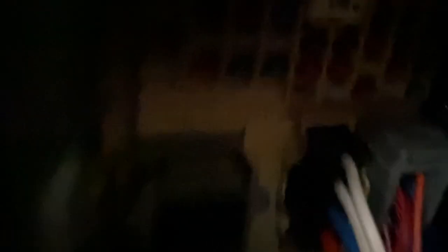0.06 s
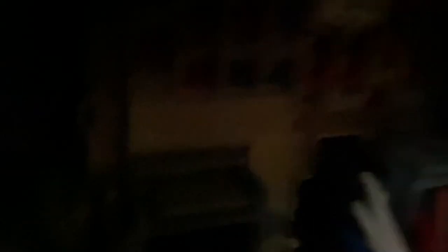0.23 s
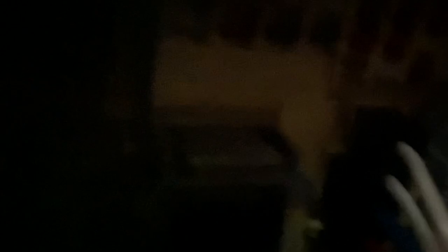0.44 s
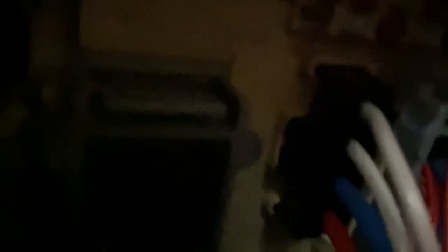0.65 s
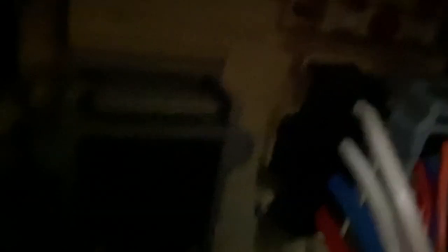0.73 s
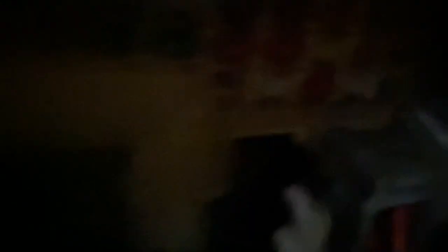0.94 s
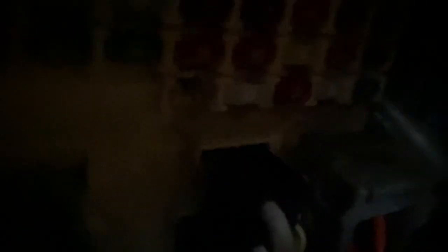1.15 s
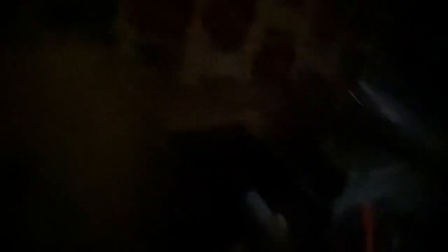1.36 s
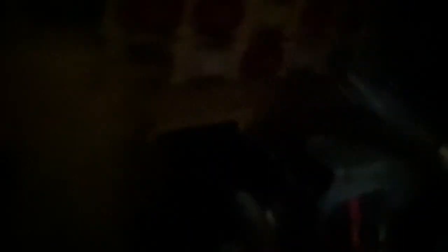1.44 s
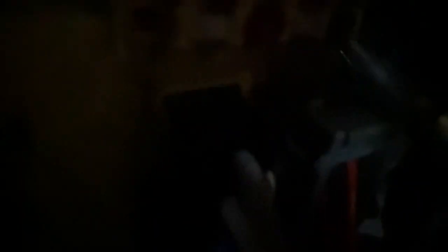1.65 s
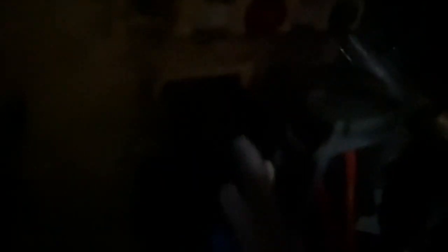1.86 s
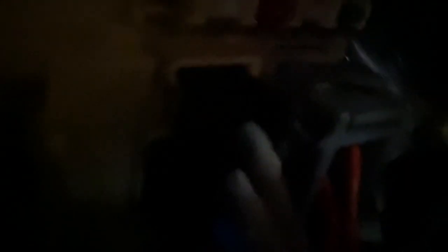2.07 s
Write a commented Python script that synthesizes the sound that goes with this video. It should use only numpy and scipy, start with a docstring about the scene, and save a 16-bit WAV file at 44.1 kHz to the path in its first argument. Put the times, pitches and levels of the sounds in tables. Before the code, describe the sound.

Fast, dry clicks come nonstop from a relay in a plastic fuse box inside a car. A short bump on the trim sounds near the start, then the clicking is heard slightly closer, with faint rumble and hiss beneath.

```python
"""Relay chatter in a car

A relay in the fuse box clicks about 21 times a second, with a few stumbles. Each click is a light
tick, the armature's strike and two rebounds, which excite the plastic case and a small spring.
Early on, a bump sets a trim panel vibrating and rattling; after a second the microphone moves closer.
A low hum, a rumble and a fading hiss lie underneath."""
import sys
import numpy as np
from scipy import signal
from scipy.fft import rfft, irfft, next_fast_len
from scipy.io import wavfile
from scipy.ndimage import uniform_filter1d

SR = 44100
rng = np.random.default_rng(int(sys.argv[2]) if len(sys.argv) > 2 else 0)


def persist_wave(psi):
    """Save psi, clipped to +-1, as 16-bit WAV."""
    counts = np.round(np.clip(psi, -1, 1) * 32767).astype(np.int16)
    wavfile.write(sys.argv[1], SR, np.atleast_2d(counts).T)


N = 92610

# low hum and the drone beneath it: time_s, pitch_hz, level_db
HUM = [(0, 94, -59), (.08, 90.13, -54), (.36, 89.67, -47), (.46, 108.2, -50.5), (.68, 106.2, -51.5),
       (.78, 104.8, -73.5), (.85, 107, -49.5), (.91, 103.5, -69.5), (1, 104.6, -54), (1.12, 105, -50.5),
       (1.27, 109.6, -51), (1.33, 100.3, -64), (1.39, 109.9, -51), (1.49, 108.6, -51.5), (1.57, 108.6, -64),
       (1.69, 109.9, -50.5), (2.1, 107, -52.5)]
DRONE = [(0, 53.14, -55), (1.15, 55.17, -65.5), (1.7, 58.76, -58)]
# spectra of the cabin noises: frequency_hz, gain_db
RUMBLE_SPECTRUM = [(20, -22), (95, 4), (170, -6), (800, -22.5), (2000, -68)]
HISS_SPECTRUM = [(100, -6), (600, 0), (5500, -7), (8000, -13), (16000, -19)]
# envelopes of the cabin noises: time_s, level_db
RUMBLE_LEVEL = [(0, -58), (.26, -44), (.45, -56), (2.1, -58)]
HISS_LEVEL = [(0, -48.5), (.22, -45), (.4, -54), (.7, -60.5), (1.2, -66.5), (2.1, -66)]
# relay clicks: start_s
CLICKS = [0.0022, 0.047, .095, 0.143, .187, 0.2341, .281, 0.328, 0.3738, 0.4208, 0.4662, 0.5101, 0.558,
          0.6033, 0.6502, .7, 0.7483, 0.796, 0.8446, .892, 0.939, 0.9872, 1.0339, 1.0792, 1.1263, 1.171,
          1.218, 1.286, 1.3299, 1.3776, 1.42, 1.4656, 1.5334, 1.5806, 1.6267, 1.6713, 1.7168, 1.764, 1.81,
          1.8563, 1.921, 1.9675, 2.015, 2.0606]
# strength of the chatter: time_s, gain_db
RELAY_GAIN = [(.25, -4), (.6, -1), (1.42, -0.5), (2.06, -0.63)]
# armature's strike and two rebounds within a click: start_ms, level_db, t60_ms
CONTACTS = [(-.3, 0, 4.5), (1.1, -1, 4), (2.4, -12, 10)]
# resonances of the plastic case: centre_hz, half_width_hz, far_db, close_db
CASE_MODES = [(678, 54, -9.5, -5.5), (1039, 111, 2.5, 2), (2293, 115, -2.5, -2), (2561, 91, -0.5, 2.0),
              (3060, 33, -12, -2), (3224, 110, -5.5, 0.5), (3856, 49, -4, -1.5), (4170, 76, 4.5, 1),
              (4685, 125, 9, 10.5), (5400, 105, -1.5, 0), (6220, 270, -11, -12), (7420, 71, -9, -4.0),
              (7990, 150, -12, -3), (8690, 114, -2, 2), (9380, 177, 4.5, 6.5), (9980, 116, 1.5, -14.5),
              (10790, 120, 4, 2), (11465, 190, -1.5, 3), (12135, 160, 2, 7.5), (15600, 191, -10, -8.5)]
# response of the case between resonances: frequency_hz, gain_db
CASE_FLOOR = [(100, -23.5), (400, -24.5), (1700, -36), (7000, -18.5), (14000, -11.5), (16500, -34.5)]
# microphone's move from far to close: start_s, end_s
APPROACH = (1, 1.03)
# modes of the spring and frame: pitch_hz, level_db, t60_s
SPRING_MODES = [(3345, -57, .32), (1080, -54, .075), (695, -60, .06)]
# spectrum of the fuse box's rattle: frequency_hz, gain_db
RATTLE_SPECTRUM = [(200, -21.5), (650, -19.5), (4500, -10.5), (9000, -11.5), (16000, -38)]
# impacts on the trim: start_s, boom_db, crack_db
BUMPS = [(0.226, -29.5, -50), (0.2348, -5, -7), (0.2567, -17, -18), (0.272, -22.5, -30), (0.297, -27, -46),
         (0.325, -36, -54), (0.36, -28.5, -47)]
# modes of the trim panel: pitch_hz, level_db, t60_s
PANEL_MODES = [(85.7, -10.5, 0.15), (141.3, -20, 0.15), (189.8, -0.5, 0.054), (235, 4, 0.033),
               (319, -5, 0.055), (508.2, -21, .12), (692, -18.5, 0.11), (738, -25.5, 0.064),
               (873, -7, 0.032), (1223, -23, 0.083), (1313, -17, 0.045), (1760, -20.5, 0.047),
               (2110, -20.5, 0.028)]
# spectrum of the trim's crack and scuff: frequency_hz, gain_db
CRACK_SPECTRUM = [(300, 1), (850, 18), (1400, 5.5), (3200, 2), (4600, -10.5), (12000, -35)]
# right microphone port relative to the left: frequency_hz, gain_db
RIGHT_GAIN = [(300, 1.5), (1000, -17), (1700, 6), (3200, -10), (4800, -11.5), (6800, -0.5)]
# phase of the right port behind the left: frequency_hz, lag_rad
RIGHT_LAG = [(260, 0), (700, 2.2), (3300, .4), (6700, 0), (9000, -3), (11000, -6.1), (15000, -12.5)]


def amp(db):
    """Decibels as an amplitude ratio."""
    return 10 ** (np.asarray(db) / 20)


def along(points, hz):
    """Interpolation on a logarithmic frequency axis."""
    knots_hz, values = np.transpose(points)
    return np.interp(np.log(hz + 1), np.log(knots_hz + 1), values)


def curves(rows):
    """Linear interpolation in time: one value per sample for each later column."""
    time_s, *columns = np.transpose(rows)
    return [np.interp(np.arange(N) / SR, time_s, column) for column in columns]


def filtered(x, response):
    """Linear filtering multiplies the spectrum by a frequency response."""
    size = 2 * next_fast_len(N)
    return irfft(rfft(x, size) * response(np.fft.rfftfreq(size, 1 / SR)), size)[..., :N]


def causal(gain):
    """A minimum-phase response with this gain rings only after it is excited."""
    cepstrum = irfft(np.log(np.maximum(gain, 1e-6)))
    half = len(cepstrum) // 2
    cepstrum[1:half] *= 2
    cepstrum[half + 1:] = 0
    return np.exp(rfft(cepstrum))


def decay(t, t60):
    """Exponential decay of 60 dB in t60, silent before t = 0."""
    return (t >= 0) * np.exp(-np.log(1000) * np.abs(t) / t60)


def ring(t, modes):
    """Free vibration is a sum of damped sinusoids."""
    return sum(amp(db) * decay(t, t60) * np.sin(2 * np.pi * hz * t) for hz, db, t60 in modes)


def add(track, start_s, sound):
    """Superposition: the sound joins the track at start_s."""
    i = round(start_s * SR)
    part = sound[max(-i, 0):N - i]
    track[max(i, 0):max(i, 0) + len(part)] += part


def hum(rows):
    """A low tone wavers in pitch and level; its phase is the integral of its frequency."""
    hz, db = curves(rows)
    cycles = np.cumsum(hz) / SR + rng.random()
    return np.sqrt(2) * amp(db) * np.sin(2 * np.pi * cycles)


def cabin_noise(spectrum, levels, side_db):
    """Coloured noise gains width from a side signal of opposite sign in the two channels."""
    mid, side = filtered(rng.standard_normal((2, N)), lambda hz: amp(along(spectrum, hz)))
    stereo = np.array([mid + amp(side_db) * side, mid - amp(side_db) * side])
    level_db, = curves(levels)
    return amp(level_db) * stereo / np.sqrt(np.mean(stereo ** 2))


def contact_noise(envelope, passes):
    """A brief contact is broadband: a burst of unit energy with a nearly flat spectrum."""
    burst = envelope * rng.standard_normal(len(envelope))
    for _ in range(passes):  # flatten the spectrum, then restore the envelope
        burst = irfft(np.exp(1j * np.angle(rfft(burst))), len(envelope))
        burst *= envelope / np.sqrt(np.abs(uniform_filter1d(burst ** 2, size=32)) + 1e-16)
    return burst / np.linalg.norm(burst)


def armature(tick_lead_ms=4, tick_db=-11.5, variety=0.35):
    """Impact excitation: a light tick, a strike and two rebounds, nearly alike in every click."""
    t_ms = np.arange(-256, 1280) / SR * 1000
    tick = decay(t_ms + tick_lead_ms, t60=5)
    strike = np.sqrt(sum((amp(db) * decay(t_ms - ms, t60)) ** 2 for ms, db, t60 in CONTACTS))
    blows = np.zeros(N)
    for envelope, gain in ((tick, amp(tick_db)), (strike, 1)):
        envelope = envelope / np.linalg.norm(envelope)
        repeated = contact_noise(envelope, passes=40)
        for start_s in CLICKS:
            fresh = variety * envelope * rng.standard_normal(len(t_ms))
            add(blows, start_s + t_ms[0] / 1000, gain * (repeated + fresh))
    return blows


def case_response(hz, levels_db):
    """The resonances of the plastic case add in power above a broad floor."""
    power = amp(along(CASE_FLOOR, hz)) ** 2
    for (centre_hz, half_width_hz, *_), db in zip(CASE_MODES, levels_db):
        detuning = (hz - centre_hz) / half_width_hz
        power += (amp(db) / (1 + detuning ** 2)) ** 2
    return causal(np.sqrt(power))


def relay_case(blows):
    """The case resonates to the blows; the balance of its modes depends on the listening position."""
    _, _, far_db, close_db = np.transpose(CASE_MODES)
    closeness = np.interp(np.arange(N) / SR, APPROACH, (0, 1))
    far = filtered(blows * (1 - closeness), lambda hz: case_response(hz, far_db))
    close = filtered(blows * closeness, lambda hz: case_response(hz, close_db))
    return far + close


def spring():
    """Spring and frame ring faintly in free vibration; each click stops and restarts them."""
    out = np.zeros(N)
    for start_s, gap_s in zip(CLICKS, np.diff(CLICKS, append=N / SR)):
        t = np.arange(round(gap_s * SR)) / SR
        add(out, start_s, ring(t, SPRING_MODES))
    return out


def fuse_box_rattle(t60_s=0.026):
    """Each click shakes the fuse box into a diffuse clatter, uncorrelated at the two ports."""
    fade = decay(np.arange(SR // 10) / SR, t60_s)
    envelope = np.zeros(N)
    for start_s in CLICKS:
        add(envelope, start_s, fade / np.linalg.norm(fade))
    clatter = envelope * rng.standard_normal((2, N))
    return filtered(clatter, lambda hz: causal(amp(along(RATTLE_SPECTRUM, hz))))


def trim_bump(attack_s=0.002, crack_t60_s=0.006, scuff_t60_s=0.041, scuff_db=-14, cutoff_hz=155):
    """Each impact pushes the panel in and excites its modes, with a crack and a scuff of loose trim."""
    t = np.arange(SR // 4) / SR
    boom = -ring(t, PANEL_MODES) * (1 - np.exp(-t / attack_s))
    crack_fade = decay(t[:SR // 20], crack_t60_s)
    scuff_fade = decay(t[:SR // 20], scuff_t60_s)
    booms, cracks = np.zeros((2, N))
    for start_s, boom_db, crack_db in BUMPS:
        crack = np.linalg.norm(crack_fade) * contact_noise(crack_fade, passes=20)
        scuff = amp(scuff_db) * scuff_fade * rng.standard_normal(len(scuff_fade))
        add(booms, start_s, amp(boom_db) * boom)
        add(cracks, start_s, amp(crack_db) * (crack + scuff))
    # a small panel radiates low frequencies poorly
    booms = signal.sosfilt(signal.butter(2, cutoff_hz, "highpass", fs=SR, output="sos"), booms)
    return booms + filtered(cracks, lambda hz: causal(amp(along(CRACK_SPECTRUM, hz))))


def port_response(hz):
    """Two microphone ports share the power, with level and phase differences that vary with frequency."""
    right = amp(along(RIGHT_GAIN, hz)) * np.exp(-1j * along(RIGHT_LAG, hz))
    return np.array([np.ones_like(right), right]) / np.sqrt(1 + np.abs(right) ** 2) * np.sqrt(2)


def scene():
    """Direct sound from relay and trim superposes on the diffuse rattle and the cabin's background."""
    relay_db, = curves(RELAY_GAIN)
    relay = amp(relay_db) * (relay_case(armature()) + spring())
    direct = filtered(relay + trim_bump(), port_response)
    rattle = amp(relay_db) * fuse_box_rattle()
    tones = hum(HUM) + hum(DRONE)
    rumble = cabin_noise(RUMBLE_SPECTRUM, RUMBLE_LEVEL, side_db=-6.5)
    hiss = cabin_noise(HISS_SPECTRUM, HISS_LEVEL, side_db=0.5)
    return direct + rattle + tones + rumble + hiss


def record(dry):
    """Band limiting: a steep low-pass filter removes the highest treble."""
    cutoff_hz = 16500
    return filtered(dry, lambda hz: 1 / np.sqrt(1 + (hz / cutoff_hz) ** 300))


dry = scene()
out = record(dry)
persist_wave(out)
```